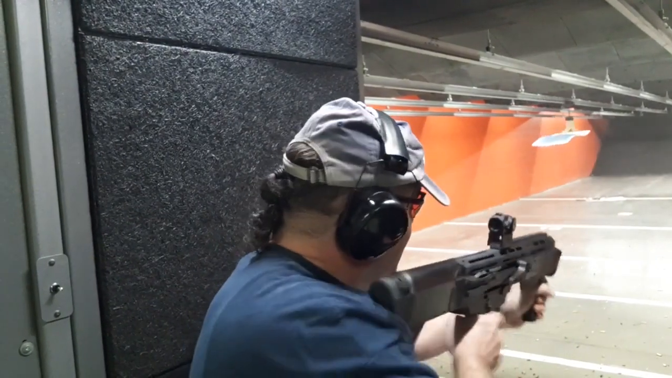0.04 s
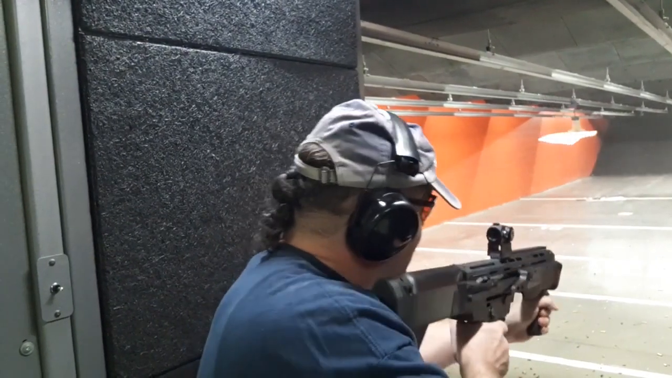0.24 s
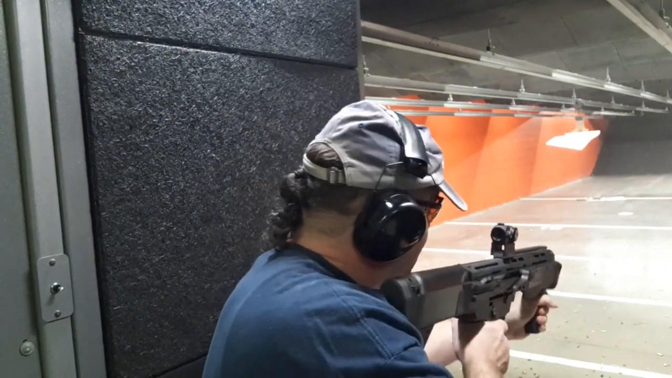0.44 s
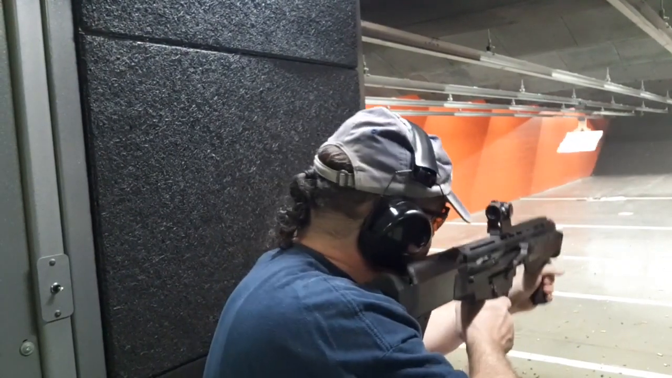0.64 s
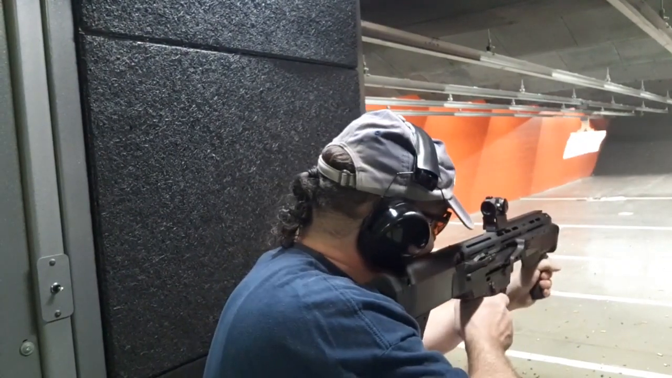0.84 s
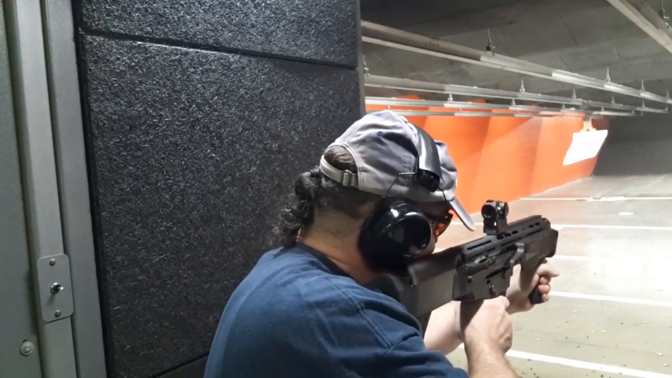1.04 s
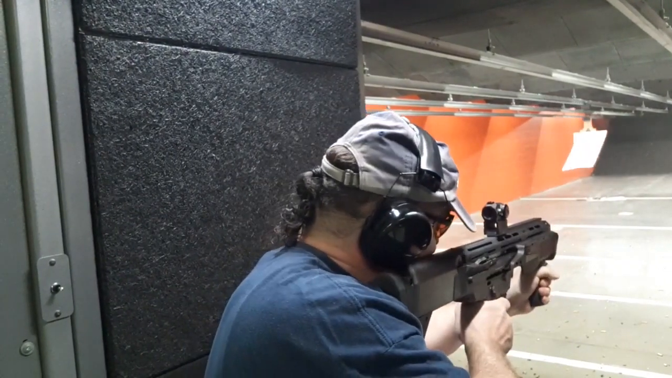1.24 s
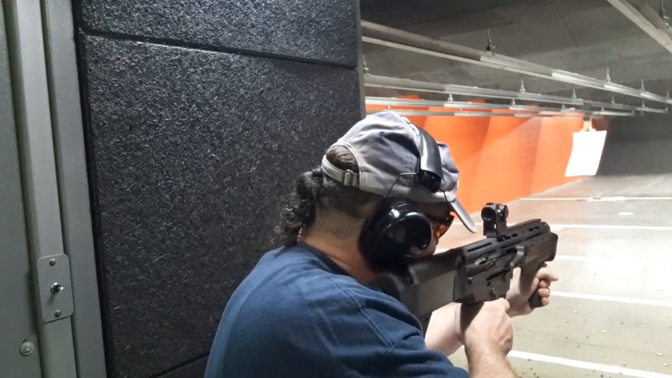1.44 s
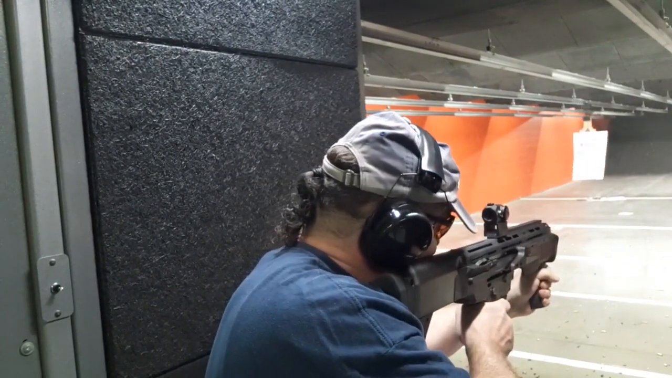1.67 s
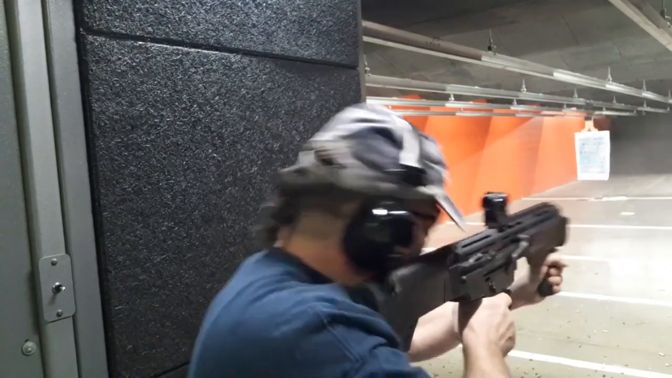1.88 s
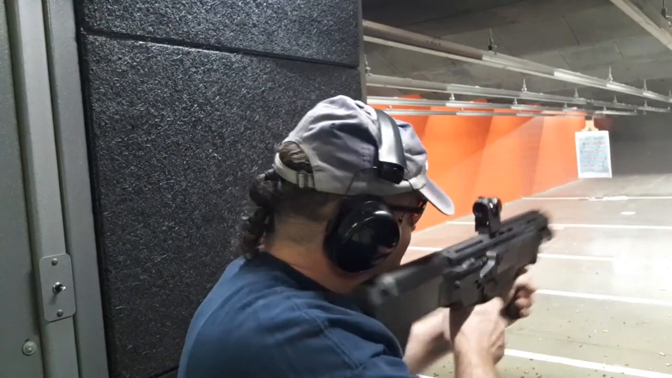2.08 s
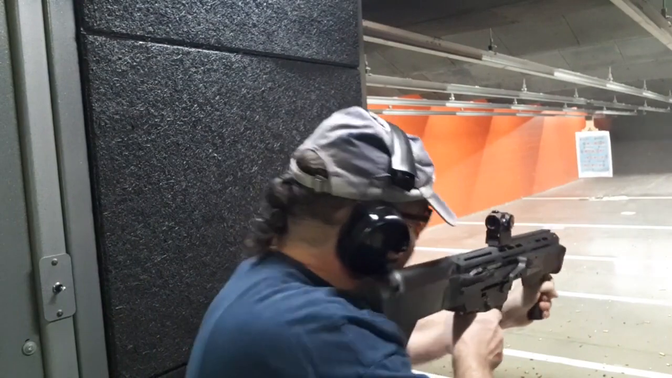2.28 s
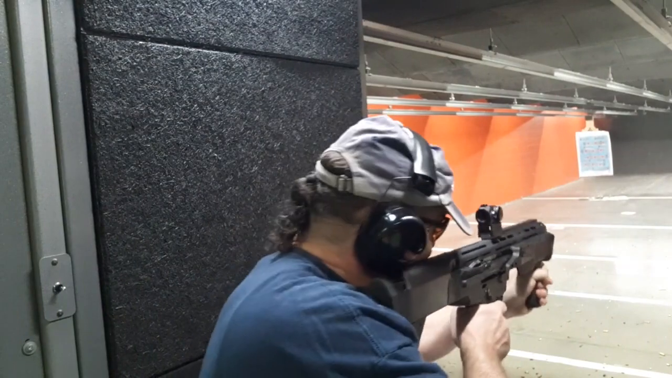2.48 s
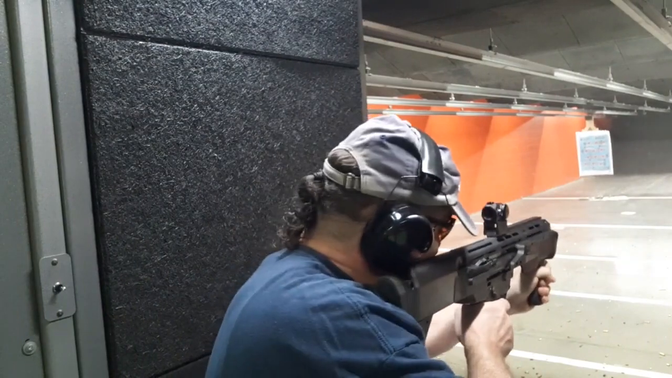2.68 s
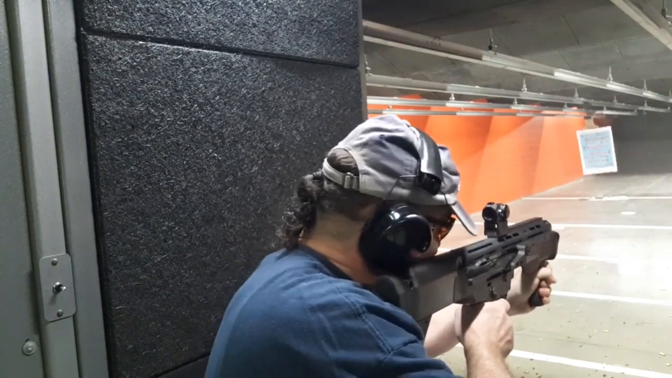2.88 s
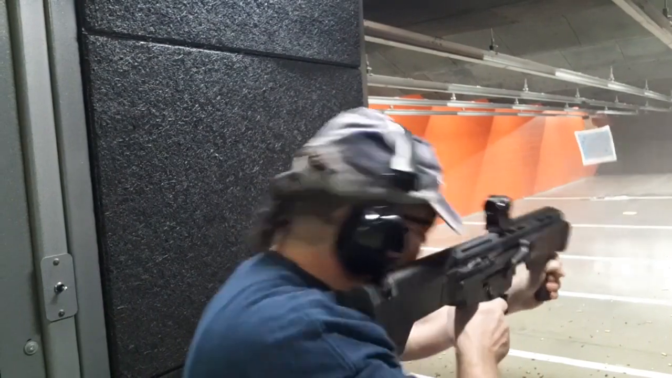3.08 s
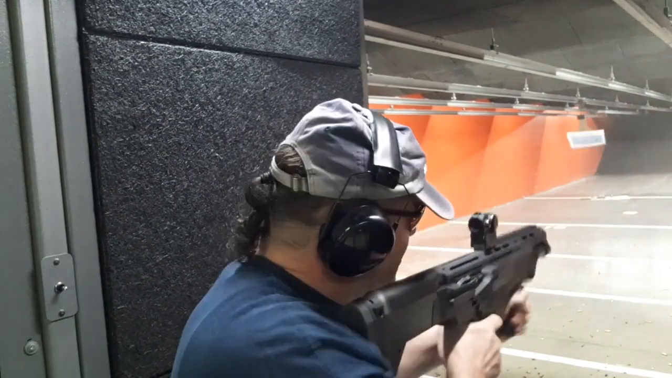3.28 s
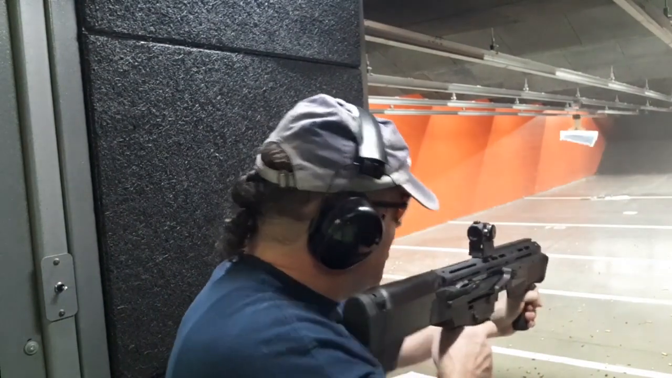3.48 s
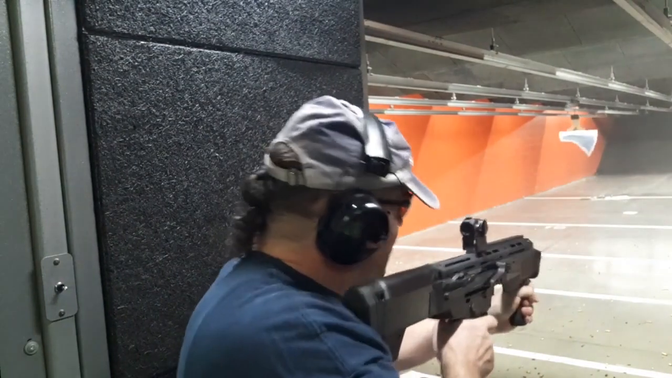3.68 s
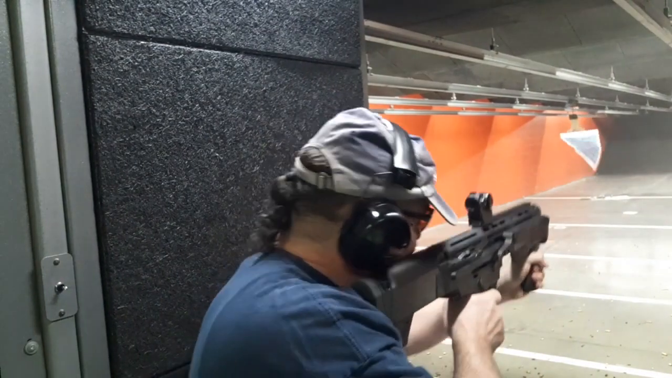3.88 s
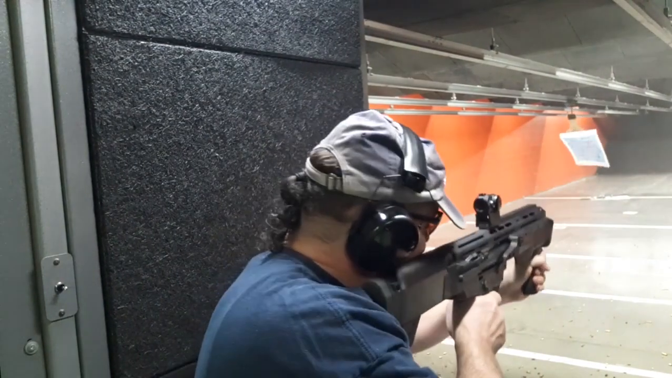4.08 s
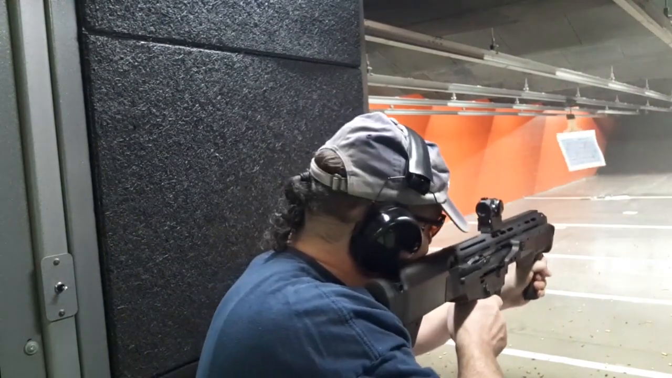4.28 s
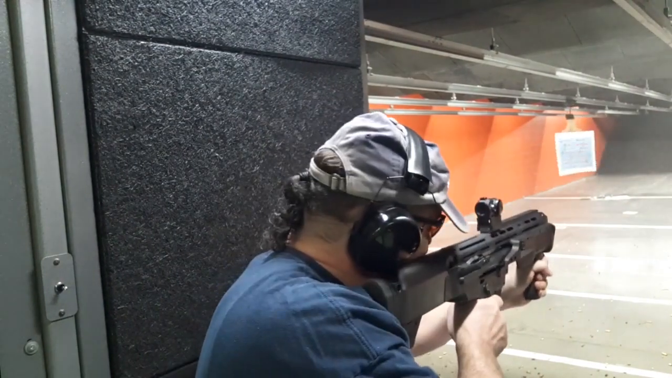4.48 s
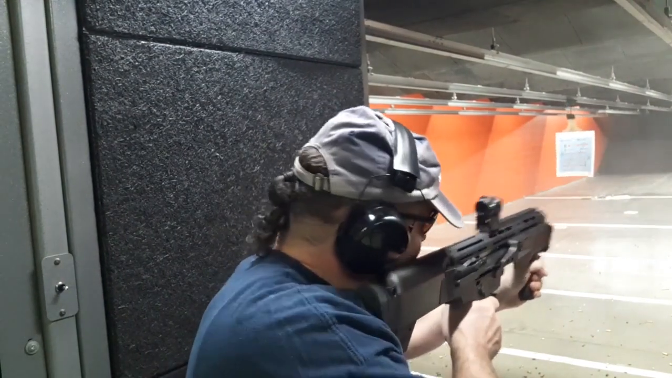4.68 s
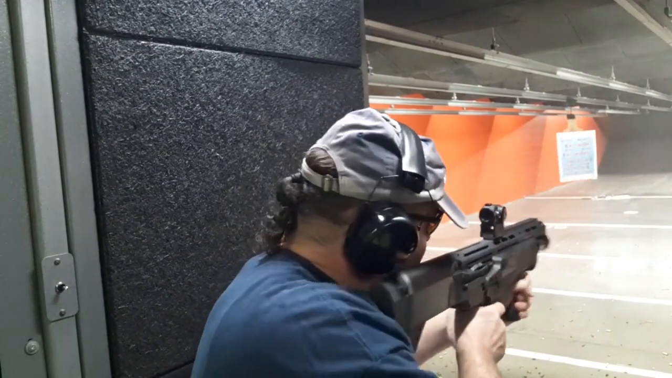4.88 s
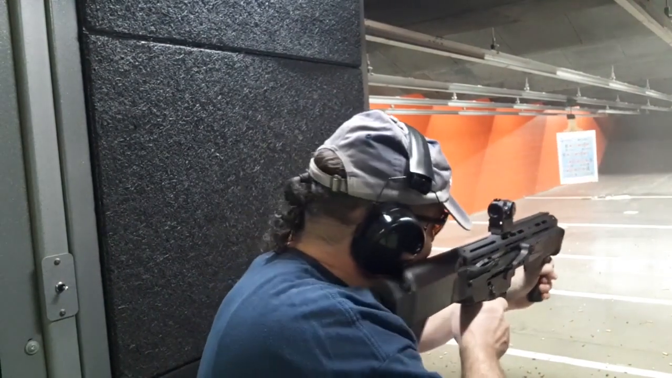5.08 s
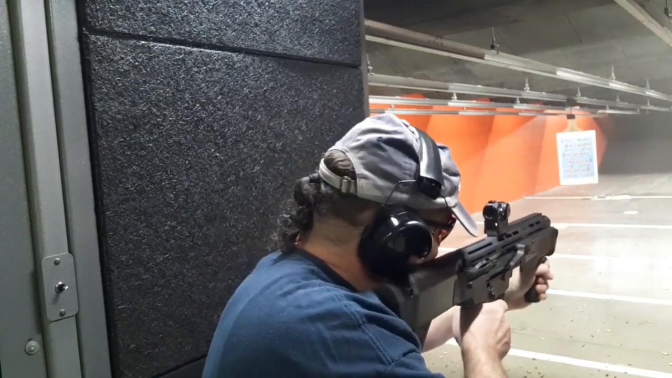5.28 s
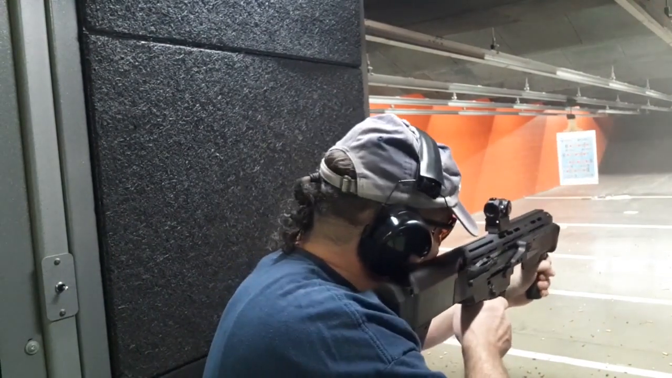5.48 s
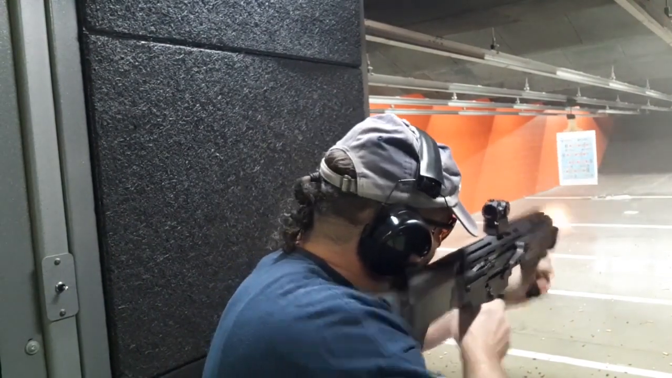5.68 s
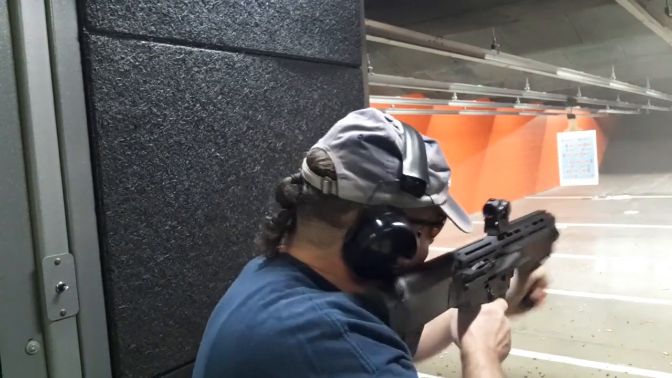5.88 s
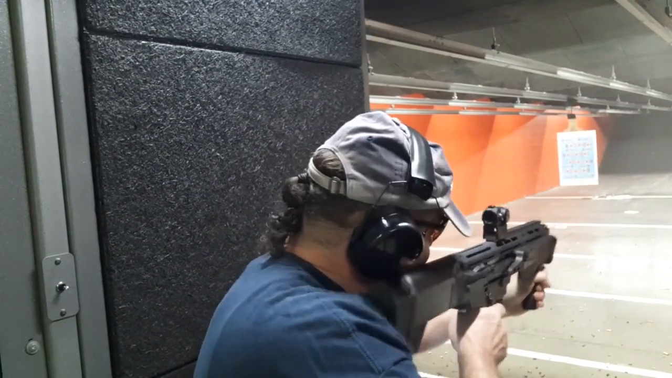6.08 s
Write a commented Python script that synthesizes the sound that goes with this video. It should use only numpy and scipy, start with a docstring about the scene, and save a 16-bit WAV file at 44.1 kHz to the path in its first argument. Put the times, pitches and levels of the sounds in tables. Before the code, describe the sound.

Close in a shooting booth, a pump is racked as other lanes fire, then four heavy shotgun blasts roll through a concrete hall.

```python
"""In a booth of an indoor shooting range, a pump shotgun is racked as two shots sound from other lanes, then fires four times.
Blasts are shaped noise: a crack in the booth, a swelling concrete hall and a long echo from down the range.
Hammer, trigger and pump are bursts of steel chatter; empty hulls tick, pop and ping as they bounce on the floor.
A faint metallic ring comes before the first of the four shots, over steady ventilation.
The close microphone saturates and clips on its open left port; its covered right port hears very little."""
import sys
import numpy as np
from scipy import signal
from scipy.fft import rfft, irfft
from scipy.io import wavfile

SR = 44100
rng = np.random.default_rng(int(sys.argv[2]) if len(sys.argv) > 2 else 0)


def wrap_up_sound(samples):
    """Save the sound to the file named by the first command line argument, as 16-bit audio."""
    columns = np.atleast_2d(samples).T
    # keep every value between -1 and 1, then stretch to whole-number steps
    tamed = np.clip(columns, -1, 1)
    steps = np.round(tamed * 32767).astype(np.int16)
    wavfile.write(sys.argv[1], SR, steps)


N = 270419

# Levels are relative: each voice adds its own trim, and the microphone colours the mix.
# ejected hulls: (first landing [s], second landing [s], each flight as a share of the last, level [dB],
# air column [Hz], brass rim [Hz], treble [dB], tilts per landing: about -1 on the mouth, 0 flat, 1 on the head)
HULLS = [(0.829, 0.913, 0.71, -21.5, 1370, 4700, -5, [0.15, 0.18, 0.11]),
         (2.738, 2.9334, 0.51, -16.5, 1387, 4650, -4, [-0.081, 0.3, 0.1]),
         (3.752, 4.214, 0.482, -13.5, 1396, 4360, 9, [-0.063, -0.13, -1.05, 0.1, -0.7]),
         (5.18, 5.656, 0.5, -14.5, 2140, 5610, 8, [-0.17, 0.65])]
# hall's answer to a blast: (frequency [Hz], density [dB per Hz], t60 before the blast's fade factor [s], build-up [s])
HALL = [(30, -19.5, 1.8, .03), (60, -1.5, 1.1, 0.19), (116, 8, 1.082, 0.1), (252, 5.5, 0.88, 0.038),
        (550, 4.5, 0.68, 0.026), (1100, 1, 0.68, 0.0068), (2200, -1.5, 0.62, 0.016), (3950, -7, 0.69, .005),
        (5900, -6, 0.68, 0.0052), (9000, -1.5, 0.53, 0.0037), (16100, -12, 0.29, 0.0033)]
# long echo from far down the range: (frequency [Hz], density [dB per Hz])
FAR_ECHO = [(30, -16), (110, 6), (300, -2.5), (1000, -2.5), (3000, -9.5), (6000, -21.5), (10000, -29.5),
            (16000, -35.5)]
# blast crack, steel action and plastic hull: (frequency [Hz], density [dB per Hz])
CRACK = [(30, -12), (90, -6.5), (190, 10.5), (500, 3.5), (1500, -5.5), (5000, -2.5), (9000, 1),
         (16000, -6.5)]
STEEL = [(60, -18), (400, -9.5), (1000, -4), (1600, -4), (2100, -6), (3500, -3.5), (5600, 0), (7500, 0.5),
         (12000, -5.5), (16000, -9)]
PLASTIC = [(100, -31), (900, -35), (2000, -9), (3500, -5.5), (6000, 4), (8000, -1.5), (12000, -12.5),
           (16000, -15)]
# ventilation: (frequency [Hz], density [dB per Hz])
VENTILATION = [(25, -24.5), (85, 1.5), (150, 1.5), (300, -4.5), (600, -7.5), (1200, -13.5), (3000, -23),
               (6000, -28), (9000, -41.5), (16000, -46)]
# microphone ports: (frequency [Hz], response [dB])
OPEN_PORT = [(20, -24), (38, -11.5), (58, -1.5), (4000, 2), (5900, 2), (6600, -4.5), (7500, -18),
             (9500, -14), (11800, -6), (15500, -8)]
COVERED_PORT = [(25, -47.5), (60, -36), (180, -31), (550, -46.5), (1500, -39), (5000, -38), (6200, -57.5),
                (8000, -71), (11000, -58), (16000, -57.5)]
EDGE_HZ = 16000  # top of the microphone's band
# standing waves between floor, ceiling and walls: (frequency [Hz], width [Hz], boost [dB])
STANDING = [(55.3, 8.7, 4), (84, 8.6, 0), (114.5, 6.1, 6), (152, 22, 4.5), (215, 22, 4.5), (254.2, 20, 6.5),
            (452, 31, 4), (570, 24, 5)]
# kinds of blast: (near crack [dB], boom [Hz], boom boost [dB], bark [Hz], bark boost [dB],
# partition echo [share], fade factor on the hall's t60 [ratio])
FAR_LANE = (-10, 146.5, 0, 604.5, 3.5, 1.03, 0.47)
NEXT_LANE = (-17.5, 150, -2.5, 620, 6, 0, 0.9372)
DEEP = (1, 210, -0.9, 560, -2, 0.05, 1.0478)
HOLLOW = (-3.5, 226, -6, 469.5, 3, 0.18, 0.9568)
# shots from other lanes: (time [s], level [dB], kind of blast)
OTHER_SHOTS = [(0.050, -17.5, FAR_LANE), (0.2292, 7.5, NEXT_LANE)]
# the shotgun's own shots: (time [s], level [dB], kind of blast, force of the hammer [dB])
SHOTS = [(1.878, 13.5, DEEP, 4.5), (3.0767, 13, DEEP, 1), (4.6369, 9, HOLLOW, -2),
         (5.7753, 9, HOLLOW, -0.5)]
HAMMER_LEAD_S = 0.0103  # the hammer falls just before each blast
# pump strokes: (slide hits the back [s], slide locks home [s], shell's time into the chamber [s], pull [dB])
RACKS = [(0.001, 0.1311, 0.028, -5.5), (2.142, 2.279, 0.027, 0.5), (3.378, 3.5247, 0.013, -3.5),
         (4.910, 5.071, 0.018, 0.5), (6.019, 6.33, 0.02, -0.5)]
# blows of the action's steel parts: (level [dB], chatter held before it fades [s])
HAMMER, SLIDE_BACK, LIFTER, FEED, SLIDE_HOME = (-24, 0.0046), (-10, 0.011), (-19.5, 0.0034), (-19, 0.012), (-8, 0.011)
LIFTER_SHARE = 0.32  # the lifter snaps up this far through the forward stroke
# trigger click before the first own shot: (time [s], level [dB], chatter held before it fades [s])
TRIGGER = (1.844, -38.5, 0.011)
BOUNCE_LOSS_DB, BOUNCE_DULLING_DB = 5, 2  # taken off level and treble at every bounce
# landing on an end softens the hull and brings out that end's ring
END_ON_SOFTER_DB, MOUTH_RING_DB, HEAD_RING_DB = 15.5, 19, 28.5
FLAT_TUBE_DB, FLAT_RIM_DB = -3, -3  # rings of a flat landing
SLAP_S, SLAP_DB, SLAP_TILT = 0.014, -18, 0.53  # the brass head slaps down just after each touch
MOUTH_FLATTENING = 0.068  # share of pitch the air column loses as the floor closes the mouth
# faint metallic ring: start [s], then modes (frequency [Hz], level [dB], t60 [s])
CHINK_S, CHINK_MODES = 1.675, [(2842, -47, 1.2), (7850, -39, 0.6), (12480, -35.5, 0.45)]
RUSH_DB, RUSH_S = -49.5, 0.28  # peak level and length of the soft rush under the ring
# the rush: (frequency [Hz], density [dB per Hz])
RUSH = [(60, -9.5), (200, 0), (700, -2), (2000, -6), (6000, -10), (9000, -24.5), (16000, -30)]


def amp(db):
    """Decibels to gain."""
    return 10 ** (np.asarray(db) / 20)


def unit(x):
    """Scales to rms 1."""
    return x / np.sqrt(np.mean(abs(x) ** 2) + 1e-20)


def read(points, hz):
    """Joins (frequency, value) points on a log-frequency axis."""
    f, value = np.transpose(points)
    return np.interp(np.log(hz + 1), np.log(f + 1), value)


def add(mix, s, sound):
    """Mixes a sound in at time s, cut off at the end of the mix."""
    part = mix[:, max(round(s * SR), 0):][:, :sound.shape[-1]]
    part += sound[..., :part.shape[1]]


def hiss(size, likeness=0.33):
    """White noise at two partly alike ports."""
    left, other = rng.standard_normal((2, size))
    same = np.clip(likeness, 0, 1)
    right = same * left + np.sqrt(1 - same ** 2) * other
    return np.array([left, right])


def shaped(x, spectrum):
    """Gives white noise a spectrum at about the same power."""
    size = x.shape[-1]
    hz = np.fft.rfftfreq(size, 1 / SR)
    return irfft(rfft(x) * unit(amp(read(spectrum, hz))), size)


def colour(x, spectrum, size=4096):
    """Minimum-phase filter: the response's log gain fixes its phase, so nothing sounds early."""
    hz = abs(np.fft.fftfreq(size, 1 / SR))
    log_gain = np.log(amp(read(spectrum, hz)))
    response = np.exp(np.conj(signal.hilbert(log_gain)))
    taps = np.fft.ifft(response).real[:size // 2]
    return signal.oaconvolve(x, taps)[:len(x)]


def hump(hz, centre_hz, octaves):
    """A bell of height 1 on a log-frequency axis."""
    return np.exp(-.5 * (np.log2((hz + 1) / centre_hz) / octaves) ** 2)


def fade(t, t60):
    """Falls by 60 dB in t60 seconds."""
    return np.exp(-np.log(1000) * t / np.maximum(t60, 1e-3))


def blast_charge(hz, boom_hz, boom_db, bark_hz, bark_db, partition, detour_s=0.00162):
    """Boom and bark boosts; the padded partition returns the lows a moment later and hollows the blast."""
    boom = boom_db * hump(hz, centre_hz=boom_hz, octaves=0.68)
    bark = bark_db * hump(hz, centre_hz=bark_hz, octaves=.45)
    late_lows = partition * np.exp(-2j * np.pi * hz * detour_s - (hz / 2500) ** 2)
    return amp(boom + bark) * abs(1 + late_lows)


def hall_answer(walls, charge, hz, t, linger):
    """Concrete hall: each band of echo noise swells, surges back from the backstop and dies at its own pace."""
    centres, hall_db, t60s, rises = np.transpose(HALL)
    modes_db = sum(db / (1 + (2 * (hz - f) / width) ** 2) for f, width, db in STANDING)
    # half of the echo power follows a pattern that every shot shares
    echoes = (walls + hiss(len(t))) / np.sqrt(2)
    field = rfft(echoes) * unit(amp(read(np.c_[centres, hall_db], hz) + modes_db)) * charge
    hall = 0
    for band, centre, t60, rise in zip(np.eye(len(HALL)), centres, t60s, rises):
        # the boom rolls back from the backstop, low bands last
        arrival = 0.24 * (centre / 130) ** -.4
        surge_db = 4 * np.exp(-(np.log((t + 1e-4) / arrival) / 0.23) ** 2) / (1 + (centre / 2500) ** 2)
        swell = (1 - np.exp(-t / max(rise, 1e-3))) ** 2 * amp(surge_db)
        band_echo = irfft(field * read(np.c_[centres, band], hz))
        hall = hall + band_echo * swell * fade(t, t60 * linger)
    return hall


def shot(walls, level_db, crack_db, boom_hz, boom_db, bark_hz, bark_db, partition, linger):
    """The blast rattles round the booth, swells into the hall and comes back from far down the range."""
    size = walls.shape[1]
    t, hz = np.arange(size) / SR, np.fft.rfftfreq(size, 1 / SR)
    charge = blast_charge(hz, boom_hz, boom_db, bark_hz, bark_db, partition)
    hall = hall_answer(walls, charge, hz, t, linger)
    crack = irfft(rfft(shaped(hiss(size), CRACK)) * charge)
    booth = crack * (fade(t, t60=0.052) + amp(-3.5) * fade(t, t60=0.3))
    far = shaped(hiss(size), FAR_ECHO) * fade(t, t60=1.89)
    return amp(level_db) * (hall + amp(crack_db + 14.5) * booth + amp(-32.0) * far)


def hammers():
    """The hammer drops a moment ahead of each of the gun's own blasts: (time, level, hold) of each blow."""
    level_db, hold_s = HAMMER
    return [(s - HAMMER_LEAD_S, level_db + force_db, hold_s) for s, _, _, force_db in SHOTS]


def rack(back_s, home_s, feed_s, pull_db):
    """Pump stroke: the slide hits the back, the lifter snaps up, a shell feeds, the slide locks home."""
    back_db, back_hold_s = SLIDE_BACK
    lifter_s = back_s + LIFTER_SHARE * (home_s - back_s)
    return [(back_s, back_db + pull_db, back_hold_s),
            (lifter_s, *LIFTER),
            (home_s - feed_s, *FEED),
            (home_s, *SLIDE_HOME)]


def blow(level_db, hold_s, size=8192):
    """Steel parts chatter against each other for a moment, then settle: sparse impacts plus scrape noise."""
    t = np.arange(size) / SR
    impacts = rng.standard_normal(size) * (rng.random(size) < 1500 / SR)  # about 1500 a second
    scrape = 1.09 * rng.standard_normal(size)
    chatter = (unit(impacts) + scrape) * fade(np.maximum(t - hold_s, 0), t60=0.023)
    return amp(level_db + 6.0) * colour(chatter, STEEL)


def ring(t, hz, t60, spread, count=12):
    """Close modes start together, then drift apart and die: a firm ping with a blurred tail."""
    modes = hz * (1 + spread * rng.standard_normal((count, 1)))
    return np.sin(2 * np.pi * modes * t).mean(0) * fade(t, t60)


def hull(level_db, tube_hz, tube_db, rim_hz, rim_db, treble_db, size=8192):
    """A plastic tube ticks on concrete and skitters: its air column pops and its brass head rings."""
    t = np.arange(size) / SR
    spectrum = [(f, db + treble_db * (f > 7000)) for f, db in PLASTIC]
    tick = amp(12.5) * (t == 0)
    skitter = rng.standard_normal(size) * fade(t, t60=0.032)
    contact = amp(6.5) * colour(tick + skitter, spectrum)
    tube = amp(tube_db - 9) * ring(t, tube_hz, t60=0.11, spread=0.016)
    rim = amp(rim_db + 7) * ring(t, rim_hz, t60=.02, spread=.028)
    return amp(level_db) * (contact + tube + rim)


def landing(level_db, tilt, tube_hz, rim_hz, treble_db):
    """A flat hull ticks; on its mouth it pops, on its head it pings."""
    mouth, head = max(-tilt, 0), max(tilt, 0)
    tube_db = FLAT_TUBE_DB + MOUTH_RING_DB * mouth
    rim_db = FLAT_RIM_DB + HEAD_RING_DB * head
    return hull(level_db, tube_hz * (1 - MOUTH_FLATTENING * mouth), tube_db, rim_hz, rim_db, treble_db)


def bounces(first_s, second_s, rebound, level_db, tube_hz, rim_hz, treble_db, tilts):
    """A hull hops on the floor: flights shorten, and each bounce takes off level and treble."""
    s = first_s
    for k, tilt in enumerate(tilts):
        touch_db = level_db - k * BOUNCE_LOSS_DB - END_ON_SOFTER_DB * tilt ** 2
        voice = tube_hz, rim_hz, treble_db - k * BOUNCE_DULLING_DB
        yield s, landing(touch_db, tilt, *voice)
        yield s + SLAP_S, landing(touch_db + SLAP_DB, SLAP_TILT, *voice)
        s = s + (second_s - first_s) * rebound ** k


def stall(x, wash_db, size=2 ** 15):
    """Direct sound, quick echoes from the booth's walls and a weak hall wash, drawn anew for each sound."""
    t = np.arange(size) / SR
    quick = amp(-7.0) * unit(fade(t, t60=0.13))
    wash = amp(wash_db) * unit(fade(t, t60=0.43))
    echoes = hiss(size) * (t > .004) * (quick + wash)
    direct = t == 0
    return signal.fftconvolve(x[None], direct + echoes / np.sqrt(size), axes=1)


def chink(attack_s=0.035, size=2 ** 15):
    """A thin metallic ring of decaying modes while a soft rush of noise swells and fades."""
    t = np.arange(size) / SR
    tones = sum(amp(db) * ring(t, hz, t60, spread=0.002) for hz, db, t60 in CHINK_MODES)
    tones = tones * np.minimum(t / attack_s, 1)
    swell = np.sqrt(abs(np.sin(np.pi * np.minimum(t / RUSH_S, 1))))
    return tones + amp(RUSH_DB) * shaped(hiss(size), RUSH) * swell


def ventilation():
    """Steady air noise, heaviest in the lows."""
    return amp(-48) * shaped(hiss(N), VENTILATION)


def scene():
    """Blasts, gun action, hulls and the metallic ring over the steady ventilation."""
    out = ventilation()
    walls = hiss(size=2 ** 17)  # echo pattern shared by all shots
    for s, level_db, kind, *_ in OTHER_SHOTS + SHOTS:
        add(out, s, shot(walls, level_db, *kind))
    pump = [part for row in RACKS for part in rack(*row)]
    for s, level_db, hold_s in [TRIGGER] + hammers() + pump:
        add(out, s, stall(blow(level_db, hold_s), wash_db=-16.0))
    for row in HULLS:
        for s, sound in bounces(*row):
            add(out, s, stall(sound, wash_db=-20.5))
    add(out, CHINK_S, chink())
    return out


def record(dry, overload=1.01, ceiling=0.89):
    """The open port saturates, is coloured and clips; the covered port hears late and faintly."""
    saturated = overload * np.tanh(dry[0] / overload)
    left = np.clip(colour(saturated, OPEN_PORT), -ceiling, ceiling)
    late = np.pad(dry[1], (45, 0))[:N]  # 45 samples, about 1 ms
    right = colour(late, COVERED_PORT)
    edge = signal.firwin(401, EDGE_HZ, window=("kaiser", 8), fs=SR)
    return signal.oaconvolve(np.array([left, right]), edge[None], "same", axes=1)


dry = scene()
out = record(dry)
wrap_up_sound(out)
```